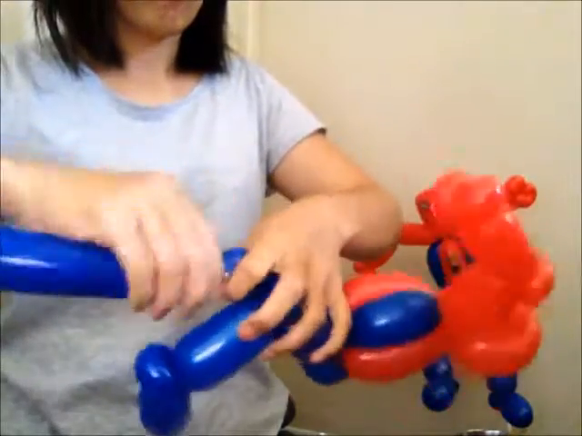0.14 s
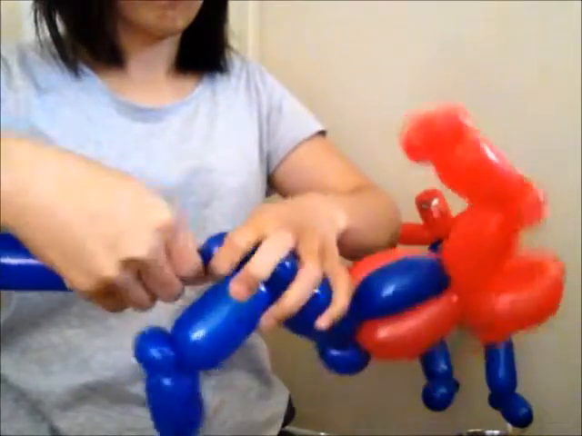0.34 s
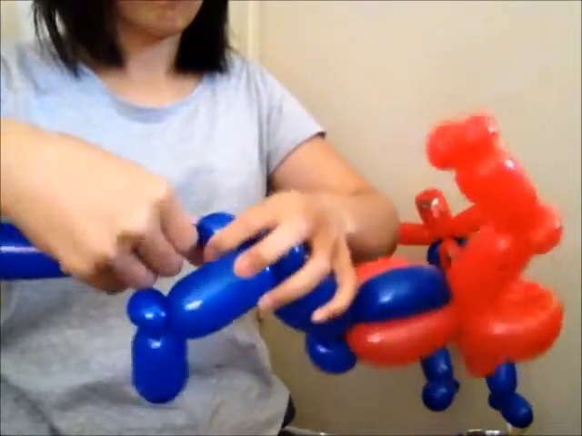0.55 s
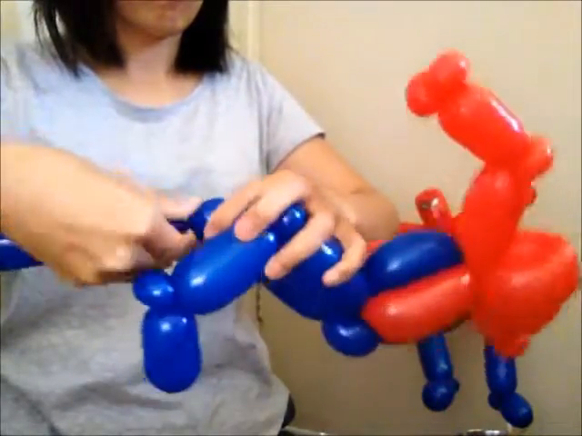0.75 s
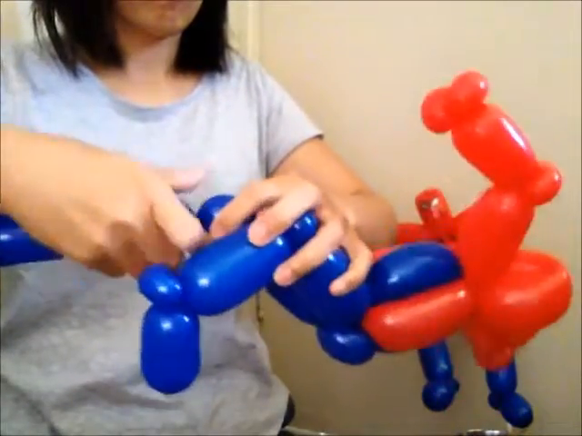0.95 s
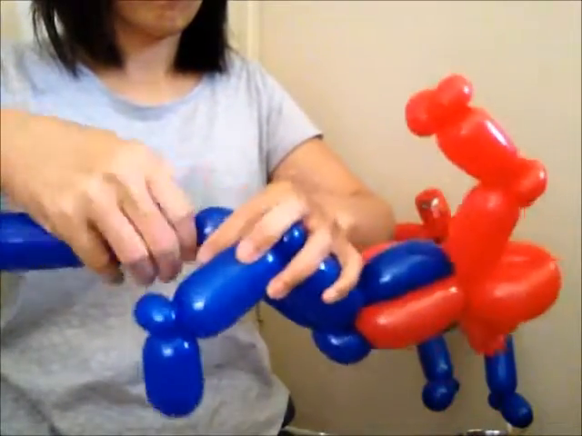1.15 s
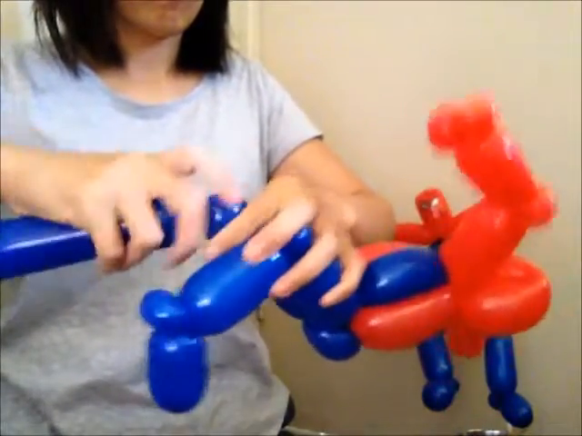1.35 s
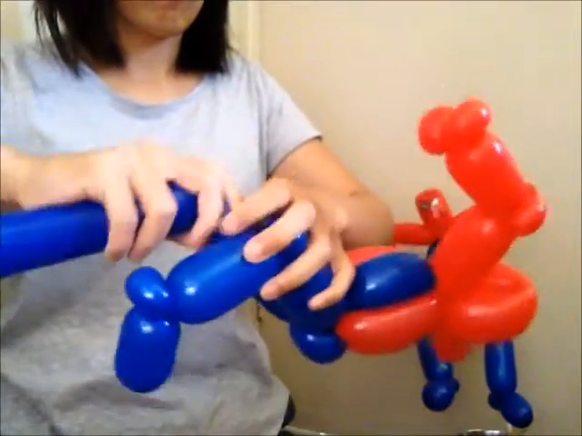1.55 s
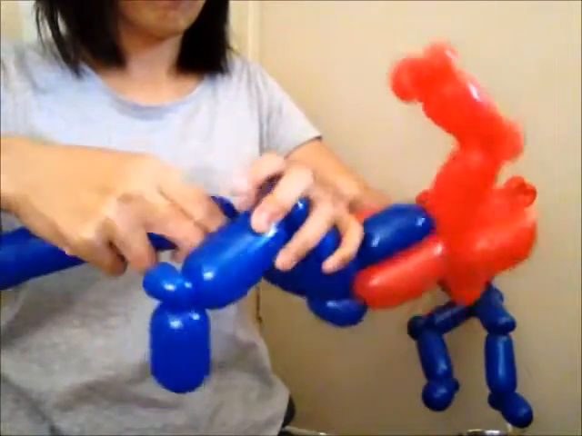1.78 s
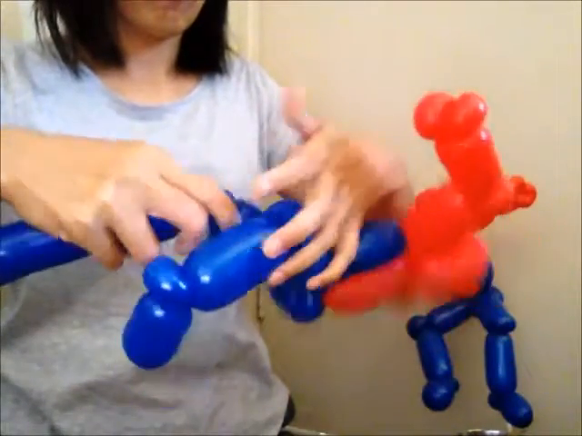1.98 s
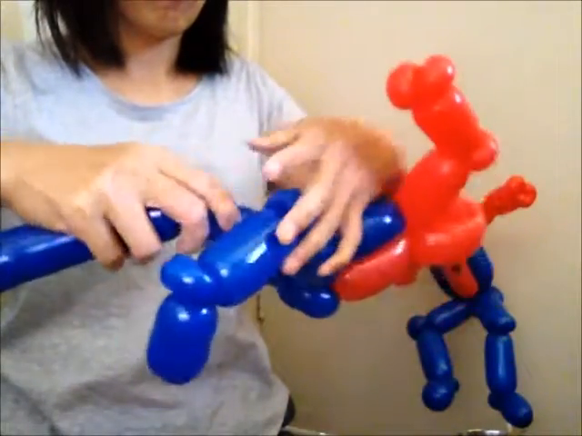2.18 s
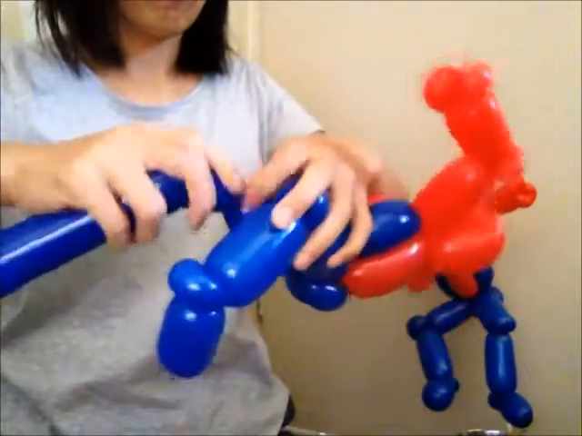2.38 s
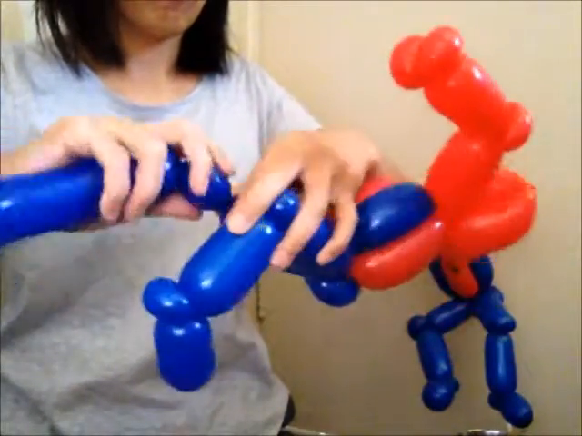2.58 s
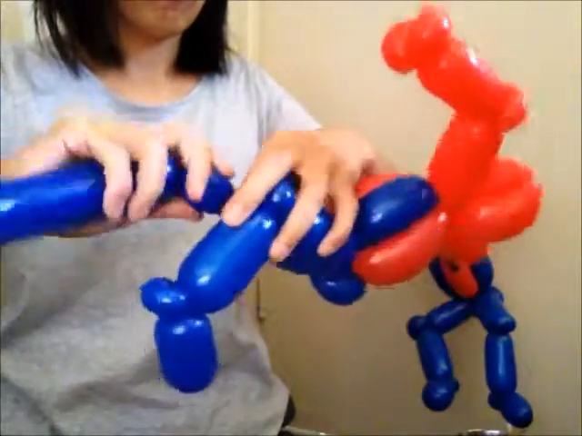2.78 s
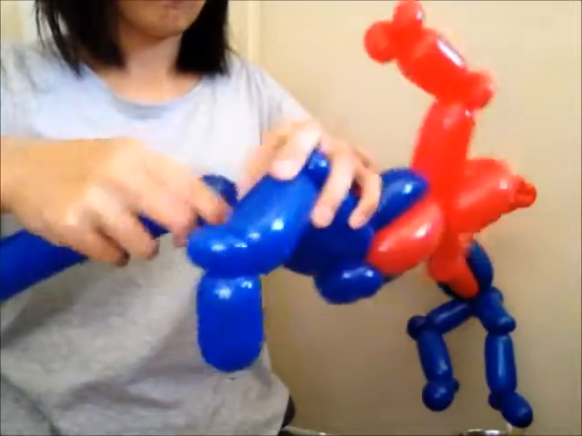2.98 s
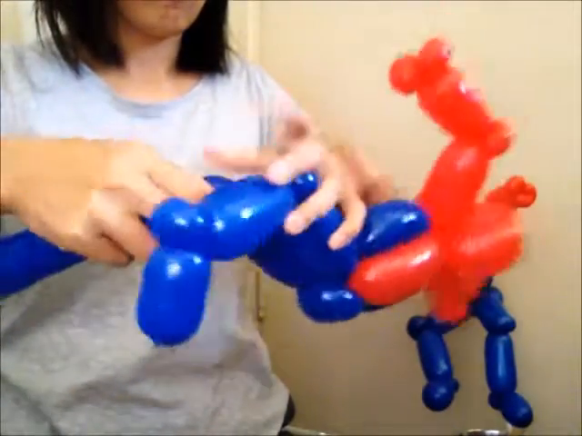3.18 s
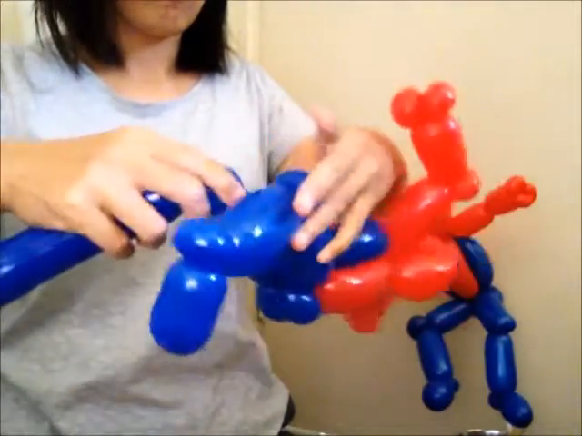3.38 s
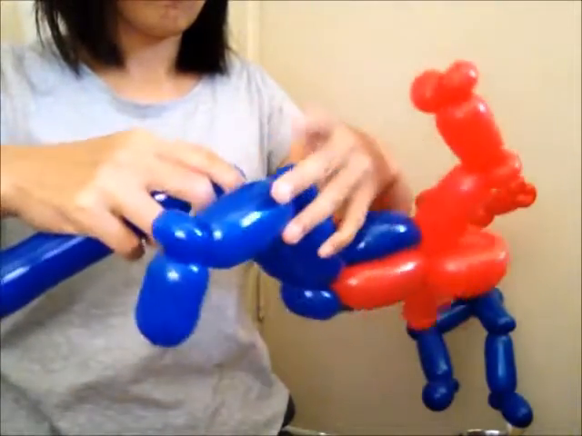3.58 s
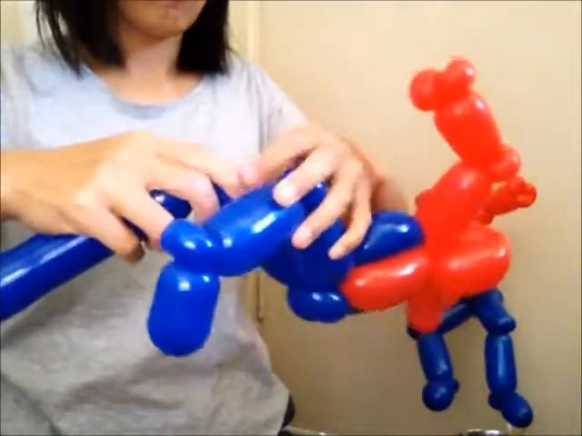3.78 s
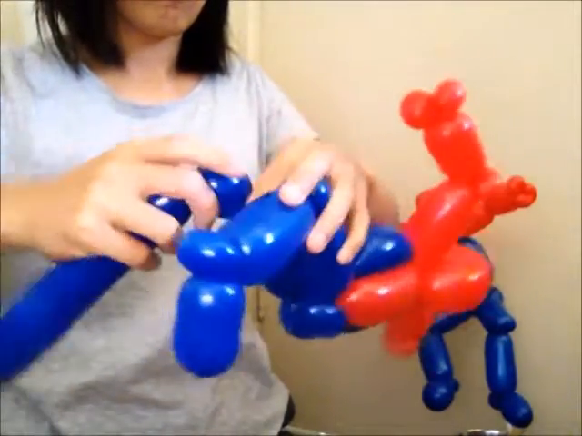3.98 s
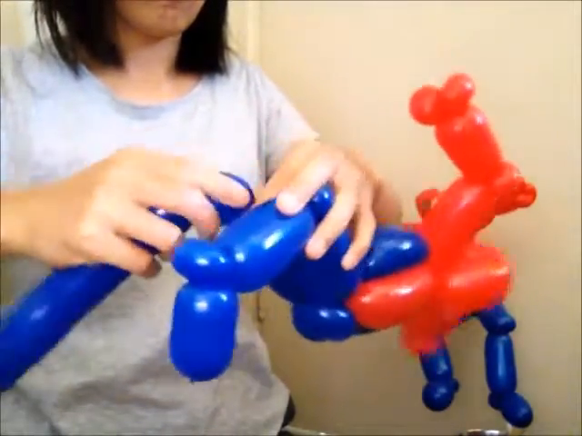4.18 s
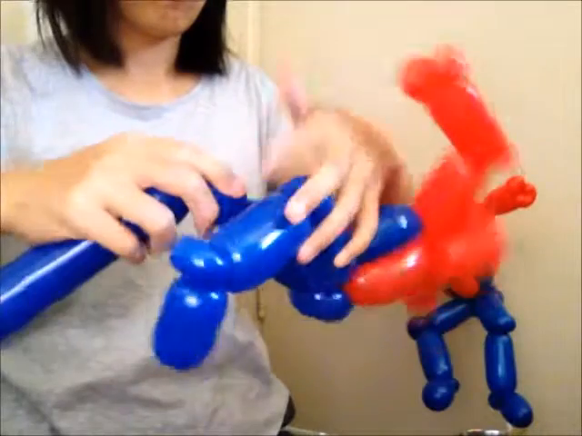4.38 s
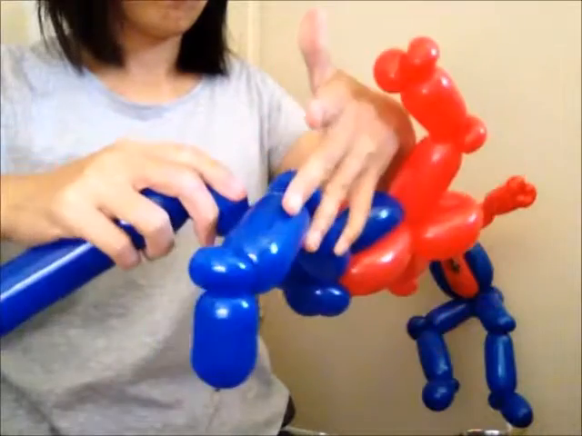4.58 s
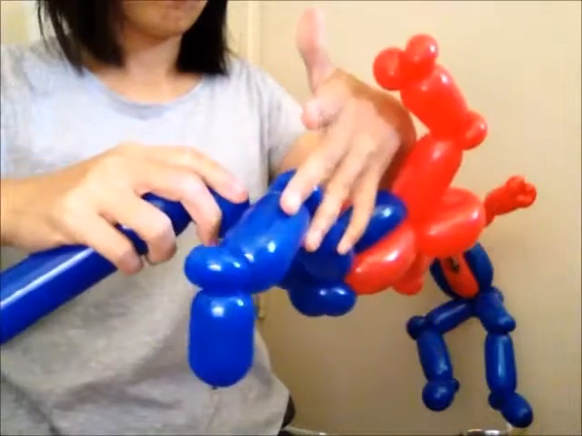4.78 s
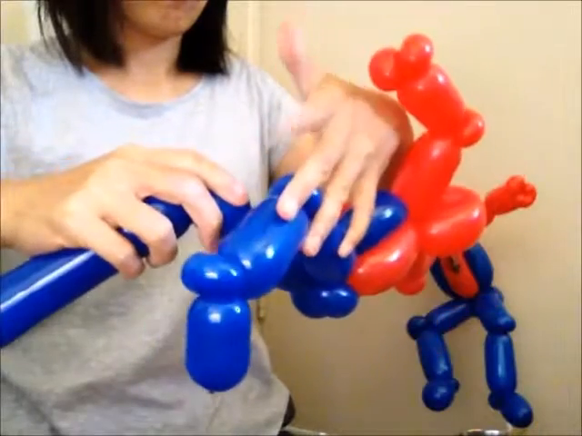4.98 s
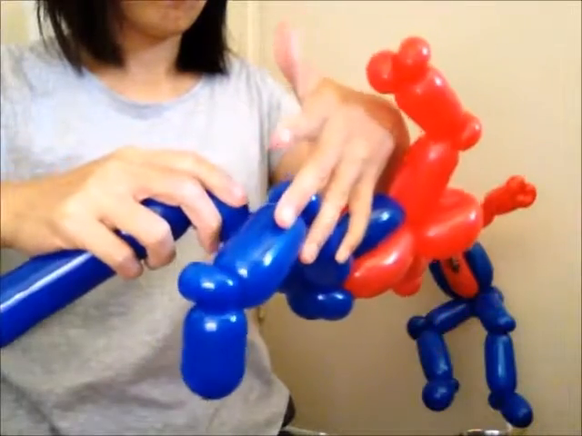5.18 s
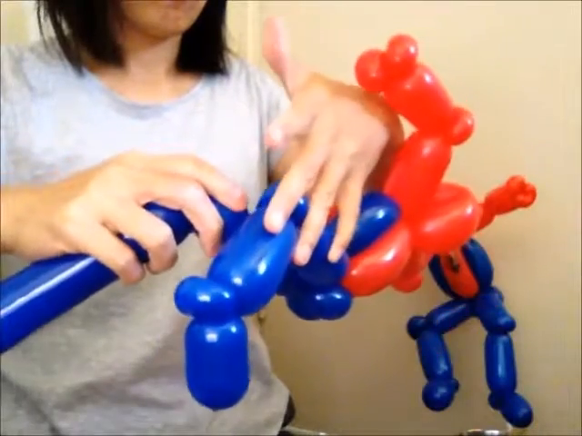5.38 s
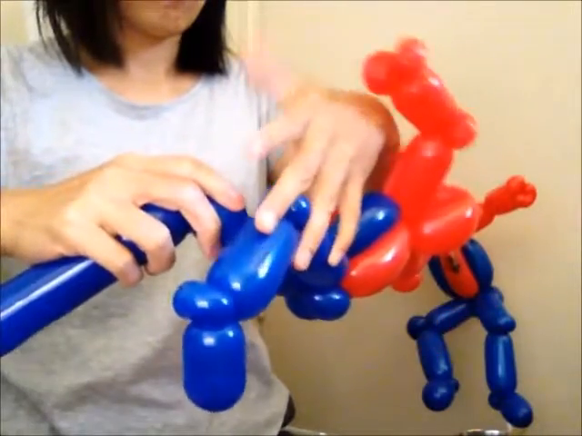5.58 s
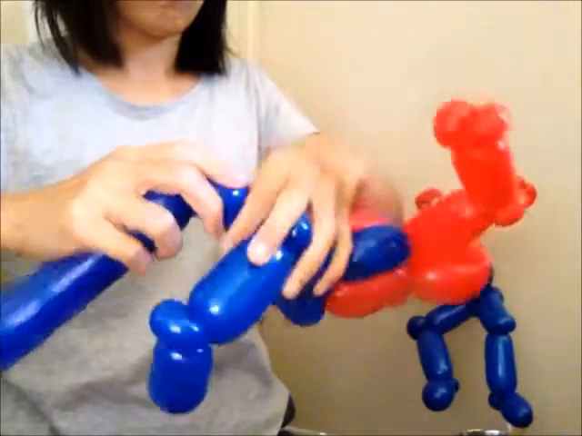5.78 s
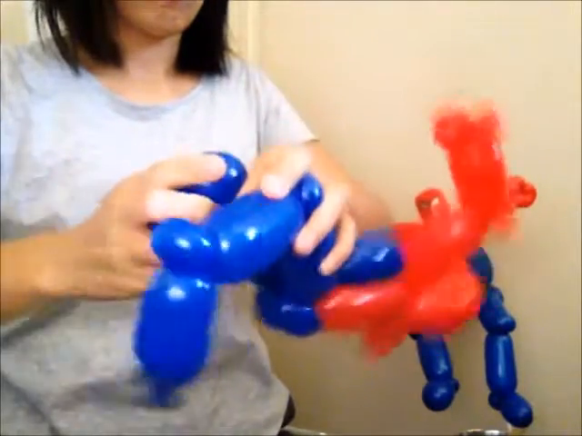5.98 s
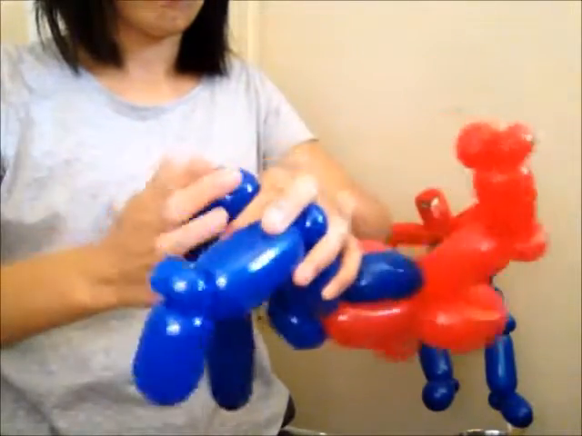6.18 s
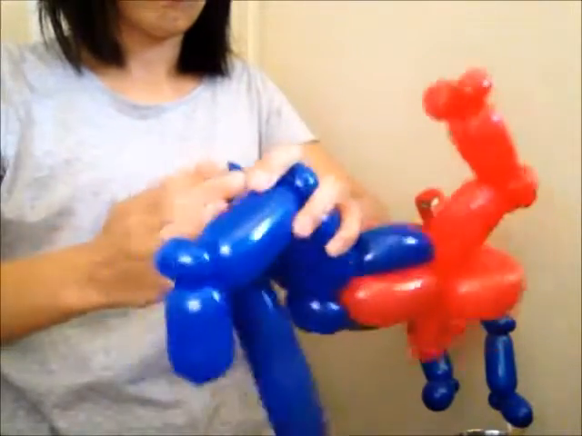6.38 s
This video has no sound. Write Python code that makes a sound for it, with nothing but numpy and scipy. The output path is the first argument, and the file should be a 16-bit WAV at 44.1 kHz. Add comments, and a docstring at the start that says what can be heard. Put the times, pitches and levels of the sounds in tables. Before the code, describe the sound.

Rubber rubs and sticks against rubber and fingers, heard closely in mono with a short indoor reflection. Stuttering creaks and squeaks start at once, grow stronger, and thin out into scattered chirps, dry snaps and crisp pinch ticks. Around five seconds the handling almost stops over faint low room noise; then sharp squeaks and thumping snaps return and continue to the end.

```python
"""Twisting a latex balloon

Hands twist and bend a long latex balloon into a figure, close to the microphone in a small room.
Rubber sticks and slips on rubber and fingers: trains of clicks, coloured by skin and inner air.
Fast trains rasp and groan; snaps are short dying stutters; short pitched tones sum harmonics.
Thin pinch ticks, low neck thumps, ragged rubbing and faint low room noise complete the scene."""
import sys
import numpy as np
from scipy import signal
from scipy.fft import rfft, irfft
from scipy.io import wavfile
from scipy.ndimage import uniform_filter1d

SR = 44100
rng = np.random.default_rng(int(sys.argv[2]) if len(sys.argv) > 2 else 0)


def put_to_file(sound):
    """Save the sound as 16-bit audio at rate SR, in the file named by the first command-line argument."""
    columns = np.atleast_2d(sound).T  # one column per channel
    safe = np.clip(columns, -1, 1)
    whole_steps = np.round(safe * 32767)
    wavfile.write(sys.argv[1], SR, whole_steps.astype(np.int16))


N = 284425
FREQS_HZ = np.maximum(np.fft.rfftfreq(2048, 1 / SR), 1)

# twists: (start [s], end [s], level [dB], centre of skin resonance [Hz], treble shelf [dB])
TWISTS = [(.005, 0.092, -35, 1255, -3.5), (0.159, 0.226, -33, 1220, -7), (0.222, 0.268, -32.5, 2610, 7),
          (0.313, 0.393, -27.5, 2900, -4), (0.428, 0.489, -34.5, 1155, -5.5),
          (0.5, 0.598, -33.5, 1860, 5.5), (0.685, 0.741, -28, 2820, 3), (0.771, .855, -28.5, 2494, 11.5),
          (0.861, 0.906, -29.5, 2230, 0), (0.929, 0.975, -25.5, 1907, 0), (1.259, 1.323, -26.5, 2450, 0),
          (1.343, 1.416, -24, 1442, 1.5), (1.563, 1.637, -25, 1948, -1), (1.64, 1.699, -24.5, 1923, 0.5),
          (1.781, 1.855, -30, 1144, 3), (2.483, 2.579, -36.5, 1180, -4.5), (2.671, 2.706, -29.5, 1227, 3.5),
          (2.848, 2.894, -22, 1900, 4), (2.947, 3.048, -27.5, 2678, 7.5), (3.235, 3.275, -33, 1258, 3),
          (3.332, 3.426, -36, 1816, -4.5), (3.449, 3.534, -33, 1635, 13), (3.555, 3.623, -35.5, 1227, -7),
          (3.78, 3.841, -35, 1240, -1.5), (3.935, 4.032, -33, 2259, 3.5), (4.119, 4.146, -31, 1380, 1),
          (4.21, 4.251, -30, 1413, 1), (4.353, 4.391, -31, 2278, 9), (5.045, 5.114, -39, 1210, 2),
          (5.349, 5.443, -42, 1301, 0), (5.7, 5.791, -34.5, 1249, 0.5), (5.892, 5.962, -27, 2101, -2.5),
          (5.959, 5.986, -20, 1377, -2), (6.019, 6.06, -27, 2426, 8.5), (6.078, 6.151, -26, 1230, -3)]
# grip lets go at once: (time [s], level [dB], energy decay time [s], hollow thump shelf [dB])
SNAP_EVENTS = [(1.733, -34.5, 0.00336, 9.5), (1.783, -31, 0.00255, 11), (2.209, -33.5, 0.0061, -0.5),
               (2.622, -32, 0.00487, -1), (2.845, -31, .002, -13), (3.135, -27.5, 0.0048, 12),
               (3.166, -31, 0.00128, 9), (3.554, -33, 0.0032, 2.5), (3.618, -31, 0.0051, 2.5),
               (3.743, -28.5, 0.01185, 2), (3.91, -34, 0.0012, 9), (3.96, -29.5, 0.00059, 7.5),
               (4.198, -36.5, 0.0015, 0.5), (4.313, -27.5, 0.0069, 7), (4.463, -37.5, 0.00122, 3),
               (4.49, -30, 0.00257, 6), (4.816, -45, 0.024, 0.5), (4.975, -49, 0.00414, 10.5),
               (5.204, -29, 0.000298, -3.5), (5.398, -41, 0.000587, 3), (5.521, -39, 0.0017, 3),
               (5.622, -43.5, 0.00474, 7.5), (5.835, -35, 0.00267, 17), (5.87, -26, 0.0012, -1.5),
               (6.216, -27, 0.0028, 8), (6.238, -26, 0.00266, 11), (6.283, -28, 0.00284, 21),
               (6.388, -23, 0.004, 13.5), (6.417, -26.5, 0.0014, 13.5)]
# short pitched tones, gliding or nearly steady, one of them brief, thin and high:
# (start [s], end [s], first pitch [Hz], last pitch [Hz], level [dB], overtone slope [dB/octave])
TONE_EVENTS = [(1.281, 1.351, 426.9, 401.2, -35, -5.5), (1.365, 1.415, 459.4, 553, -42, -15.5),
               (1.441, 1.535, 605, 576, -46.5, -12.5), (1.63, 1.686, 396.7, 426.2, -36, -9),
               (1.801, 1.864, 227.3, 446.2, -41.5, -9), (1.851, 1.953, 1257, 1221, -40, -18.5),
               (2.947, 3.014, 1294, 1410, -25.5, -0.5), (3.455, 3.515, 443.6, 456.3, -39, -3.5),
               (3.46, 3.493, 5613, 5846, -34.5, -20), (4.033, 4.095, 827.4, 847.4, -33, -1.5),
               (4.5, 4.558, 309.7, 158.8, -52.5, -15), (5.92, 5.985, 2285, 1345, -26, -4),
               (5.986, 6.058, 858, 822.1, -37, -6)]
# tightly pinched rubber lets go: (time [s], level [dB])
PINCH_EVENTS = [(3.359, -40), (3.373, -34), (3.428, -37.5), (3.481, -36.5), (3.659, -37), (3.672, -33.5),
                (3.715, -35.5), (4.007, -30), (4.02, -30), (4.425, -40.5), (4.599, -40.5), (4.63, -46.5),
                (4.66, -44), (4.67, -42.5)]
# twisted neck lurches: (time [s], level [dB])
NECK_LURCHES = [(1.292, -36.5), (1.535, -38.5), (1.558, -37.5), (1.646, -42.5), (1.674, -40.5),
                (1.798, -39), (1.824, -37.5)]
# finger creep over the skin, almost at rest near 5 s: (time [s], level [dB])
CREEP_LEVEL = [(0, -41), (1.1, -38), (1.24, -31), (1.46, -39), (1.72, -38), (2.08, -39.5), (2.4, -45),
               (2.83, -39.5), (3.1, -46.5), (3.45, -33), (3.7, -48.5), (3.86, -36), (4.3, -39.5),
               (4.7, -46), (4.77, -60), (5.62, -59), (5.78, -35), (6.45, -31.5)]
# palms stirring the inner air: (time [s], level relative to the rubbing [dB])
PALM_LEVEL = [(0, -22), (1.1, -25.5), (1.55, -17), (2.45, -10), (2.85, -26), (3.5, -12), (4.05, -19),
              (5.95, -14), (6.3, -7.5)]
# colour of a slip heard through the balloon: (frequency [Hz], gain [dB])
LATEX_COLOUR = [(90, -30.5), (170, -24.5), (240, -14), (500, -3), (640, 0), (820, 2), (1040, -4),
                (1300, 2.5), (2500, 1.5), (4200, -1.5), (6900, -2.5), (8500, -6), (15500, -11.5)]
# colour of the inner air pushed by the palms: (frequency [Hz], gain [dB])
HOLLOW_COLOUR = [(40, -36.5), (145, -25.5), (230, -7), (330, -11.5), (500, 4), (640, -1), (810, 7),
                 (1050, -10.5), (2500, -23)]
# colour of the whole tube when shaken: (frequency [Hz], gain [dB])
TUBE_COLOUR = [(60, -40), (150, -28), (215, -0.5), (300, -1), (420, 0), (900, -8), (2500, -67)]

# swell of a twist, as shares of its length (peak) and of its peak (bite, ease)
PEAK_SHARE, BITE_SHARE, EASE_SHARE = .42, .45, .32
# harder twists slip faster: nominal rate at the reference level, dB that double it
NOMINAL_SLIPS_PER_S, REFERENCE_DB, DOUBLING_DB = 410, -29, 14
CHATTER_DB, CHATTER_HZ = 1.4, 170
TUBE_DB = -12  # relative to the twist, on top of the palm level
RING_DB, RING_WIDTH_OCTAVES, RING_WANDER_OCTAVES = 11, 0.1744, .06
PINCH_DECAY_S, PINCH_RING_HZ, PINCH_BASS_DB = 0.000525, 5994.6, -2
THUMP_DECAY_S = 0.0048
DRAG_DB, DRAG_SPREAD_S = -6, 0.0606  # finger drag: level under the twist, smoothing width
PALM_FLUTTER_DB = 6
TICKS_PER_S, TICK_DB, TICK_SCATTER_DB, TICK_DECAY_S = 10, -2.5, -1.5, 0.000426  # dB re creep
SKIN_T60_S, SKIN_DB = 0.0266, 1.5  # dB re direct
ROOM_T60_S, ROOM_DB = 0.156, -8  # dB re direct
SHIFT_HZ = 9.43  # mean turnover of the reflection pattern
FLOOR_DB = -69
BASS_CUT_HZ, TOP_HZ = 55, 16100


def strokes():
    """Twists: chattering slips speed up with the swell, ring shifting skin and shake the tube."""
    out = np.zeros(N)
    step = SR // 40
    for start_s, end_s, level_db, ring_hz, treble_db in TWISTS:
        u = np.linspace(0, 1, int(max(end_s - start_s, .01) * SR))
        swell = np.interp(u, [0, PEAK_SHARE, 1], [BITE_SHARE, 1, EASE_SHARE])
        nominal_rate = NOMINAL_SLIPS_PER_S * 2 ** ((level_db - REFERENCE_DB) / DOUBLING_DB)
        slips_per_s = nominal_rate * (.75 + .35 * swell) * np.exp(.12 * walk(len(u), rate_hz=70))
        push = unit(swell * undb(CHATTER_DB * walk(len(u), rate_hz=CHATTER_HZ)))
        train = push * slips(slips_per_s, jitter=.16, scatter_db=3.0)
        tone_db = spectrum(LATEX_COLOUR) + treble_db * (1 - below(3140)) - 3 * below(1253)
        # each short slice rings a slightly different patch of skin
        for i in range(0, len(u), step):
            patch_hz = ring_hz * 2 ** (RING_WANDER_OCTAVES * rng.standard_normal())
            ringing = balloon(train[i:i + step], tone_db + resonance(patch_hz))
            add(out, start_s + i / SR, undb(level_db) * ringing)
        tube_db = TUBE_DB + np.interp(start_s, *np.transpose(PALM_LEVEL))
        add(out, start_s, undb(level_db + tube_db) * balloon(train, spectrum(TUBE_COLOUR)))
    return out


def pitched_tones():
    """Short unsteady tones, gliding or nearly steady: harmonics with wandering pitch and levels."""
    out = np.zeros(N)
    for start_s, end_s, first_hz, last_hz, level_db, slope_db in TONE_EVENTS:
        n = int(max(end_s - start_s, .01) * SR)
        pitch_hz = np.linspace(first_hz, last_hz, n) * np.exp(0.02032 * walk(n, rate_hz=228))
        phase = 2 * np.pi * np.cumsum(pitch_hz) / SR
        tone = np.zeros(n)
        for order in range(1, int(TOP_HZ / max(first_hz, last_hz))):
            overtone_db = slope_db * np.log2(order) + 4.44 * walk(n, rate_hz=111.3)
            tone += undb(overtone_db) * np.cos(order * phase)
        faded = unit(tone * signal.windows.tukey(n, .8))
        add(out, start_s, undb(level_db) * balloon(faded, spectrum(LATEX_COLOUR)))
    return out


def snaps():
    """Sudden releases of the grip, some dry, some with a thump of the inner air."""
    out = np.zeros(N)
    for time_s, level_db, decay_s, thump_db in SNAP_EVENTS:
        tone_db = spectrum(LATEX_COLOUR) + thump_db * below(1177)
        add(out, time_s, undb(level_db) * snap(decay_s, tone_db))
    return out


def pinches():
    """Tightly pinched rubber lets go with thin, dry ticks that ring high."""
    out = np.zeros(N)
    tone_db = spectrum(LATEX_COLOUR) + resonance(PINCH_RING_HZ) + PINCH_BASS_DB * below(1236)
    for time_s, level_db in PINCH_EVENTS:
        add(out, time_s, undb(level_db) * snap(PINCH_DECAY_S, tone_db))
    return out


def thumps():
    """The twisted neck lurches round and knocks the low resonances of the tube."""
    out = np.zeros(N)
    for time_s, level_db in NECK_LURCHES:
        add(out, time_s, undb(level_db) * snap(THUMP_DECAY_S, spectrum(TUBE_COLOUR)))
    return out


def rubbing():
    """Fingers creep over the skin in ragged slips; the palms stir the air inside."""
    rub_db = rubbing_db()
    rasp = slips(430 * np.exp(.4 * walk(N, rate_hz=18)), jitter=.33, scatter_db=3.5)
    rasp *= undb(rub_db + 3.06 * walk(N, rate_hz=49))
    hollow = slips(260 * np.exp(.4 * walk(N, rate_hz=14)), jitter=.4, scatter_db=9.5)
    hollow *= undb(rub_db + curve(PALM_LEVEL) + PALM_FLUTTER_DB * walk(N, rate_hz=35))
    out = np.zeros(N)
    step = SR // 16
    # the contact moves: each slice rings a different stretch of skin
    for i in range(0, N, step):
        ring_db = 0.5 * resonance(2200 * 2 ** (0.786 * rng.standard_normal()))
        skin_db = spectrum(LATEX_COLOUR) + ring_db - 4 * below(575)
        add(out, i / SR, balloon(rasp[i:i + step], skin_db))
        add(out, i / SR, balloon(hollow[i:i + step], spectrum(HOLLOW_COLOUR)))
    return out


def rubbing_db():
    """Rubbing level: creep power plus the finger drag spread around each twist."""
    power = np.zeros(N)
    for start_s, end_s, level_db, *_ in TWISTS:
        power[max(int(start_s * SR), 0):int(end_s * SR)] = undb(level_db + DRAG_DB) ** 2
    width = int(DRAG_SPREAD_S * SR)
    drag = uniform_filter1d(uniform_filter1d(power, width), width)
    return 10 * np.log10(undb(curve(CREEP_LEVEL)) ** 2 + np.abs(drag))


def ticks():
    """Small snaps at random moments; their level follows the creep."""
    out = np.zeros(N)
    count = int(TICKS_PER_S * N / SR)
    for time_s, size in zip(rng.uniform(0, N / SR, count), rng.standard_normal(count)):
        creep_db = np.interp(time_s, *np.transpose(CREEP_LEVEL))
        level_db = creep_db + TICK_DB + TICK_SCATTER_DB * min(size, 2)
        add(out, time_s, undb(level_db) * snap(TICK_DECAY_S, spectrum(LATEX_COLOUR)))
    return out


def room_air():
    """Faint low room noise: white noise shaped to a low band."""
    noise = colour(rng.standard_normal(N), 25 * below(348) - 50 * below(89.2))
    return undb(FLOOR_DB) * unit(noise[:N])


def snap(decay_s, tone_db):
    """A stuck patch jumps free: one sharp slip, then a quickly dying stutter."""
    t = np.arange(int(.02 * SR)) / SR
    stutter = slips(np.full(len(t), 900.), jitter=.4, scatter_db=2.0)
    burst = stutter * np.exp(-t / (2 * max(decay_s, 1e-4)))
    return balloon(unit(burst), tone_db)


def slips(slips_per_s, jitter, scatter_db):
    """Stick-slip clicks at a moving rate, each with its own wait and size; rms 1."""
    phase = np.cumsum(slips_per_s) / SR
    chance = rng.standard_normal((int(2 * phase[-1]) + 2, 2))
    waits = np.exp(jitter * chance[:, 0])
    at = np.searchsorted(phase, np.cumsum(waits) - waits[0])
    clicks = np.zeros(len(slips_per_s) + 1)
    clicks[at] = undb(scatter_db * np.minimum(chance[:, 1], 2))
    return unit(clicks[:-1])  # last slot collects clicks past the end


def balloon(x, tone_db):
    """Sound runs round the skin, radiates with its colour and fills the room."""
    y = colour(echoes(x, SKIN_T60_S, SKIN_DB, delay_s=.0004), tone_db)
    y = y * np.sqrt(np.sum(x ** 2) / (np.sum(y ** 2) + 1e-18))  # keep the energy of x
    return echoes(y, ROOM_T60_S, ROOM_DB, delay_s=.004)


def echoes(x, t60_s, level_db, delay_s):
    """Direct sound plus a dense dying reflection cloud that shifts as the balloon moves."""
    t = np.arange(int(t60_s * SR)) / SR
    turn = 2 * np.pi * np.cumsum(np.full(len(x), 1 / SR)) * SHIFT_HZ + walk(len(x), rate_hz=37.4)
    out = np.concatenate([x, np.zeros(len(t) - 1)])
    # crossfade between two independent clouds
    for share in (np.cos(turn), np.sin(turn)):
        cloud = rng.standard_normal(len(t)) * undb(-60 * t / t60_s) * (t > delay_s)
        out = out + undb(level_db) * signal.fftconvolve(x * share, unit(cloud) / np.sqrt(len(t)))
    return out


def colour(x, gain_db):
    """Causal minimum-phase filter with the given gain on FREQS_HZ."""
    cepstrum = irfft(np.log(undb(gain_db)))
    half = len(cepstrum) // 2
    cepstrum[1:half] *= 2
    cepstrum[half + 1:] = 0
    return signal.fftconvolve(x, irfft(np.exp(rfft(cepstrum)))[:half])


def resonance(hz):
    """Peak in dB on FREQS_HZ: the stretch of skin under the fingers rings."""
    return RING_DB / (1 + (np.log2(FREQS_HZ / hz) / RING_WIDTH_OCTAVES) ** 2)


def spectrum(points):
    """Join (frequency [Hz], gain [dB]) points on a log-frequency axis."""
    hz, db = np.transpose(points)
    return np.interp(np.log(FREQS_HZ), np.log(hz), db)


def below(hz):
    """Shelf on FREQS_HZ: near 1 well under the corner, near 0 well above."""
    return 1 / (1 + (FREQS_HZ / hz) ** 4)


def curve(rows):
    """Join (time [s], value) rows by straight lines."""
    return np.interp(np.arange(N) / SR, *np.transpose(rows))


def walk(n, rate_hz):
    """Random wander of spread near 1: normal knots joined by straight lines."""
    at = np.arange(n) * rate_hz / SR
    knots = rng.standard_normal(int(at[-1]) + 2)
    return np.interp(at, np.arange(len(knots)), knots)


def undb(db):
    """Decibels to amplitude gain."""
    return 10 ** (np.asarray(db) / 20)


def unit(x):
    """Scale to rms 1."""
    return x / np.sqrt(np.mean(x ** 2) + 1e-18)


def add(out, start_s, x):
    """Mix x into out at start_s."""
    i = max(int(start_s * SR), 0)
    out[i:i + len(x)] += x[:max(len(out) - i, 0)]


def scene():
    """The balloon over the faint low noise of the room, mono."""
    twisting = strokes() + pitched_tones() + snaps() + pinches() + thumps()
    handling = rubbing() + ticks()
    return (twisting + handling + room_air())[None]


def record(dry):
    """The recorder thins the deepest bass and cuts the top."""
    bass_cut = signal.butter(2, BASS_CUT_HZ, "high", fs=SR, output="sos")
    top_cut = signal.ellip(10, .2, 80, TOP_HZ, fs=SR, output="sos")
    return signal.sosfilt(top_cut, signal.sosfilt(bass_cut, dry))


dry = scene()
out = record(dry)
put_to_file(out)
```